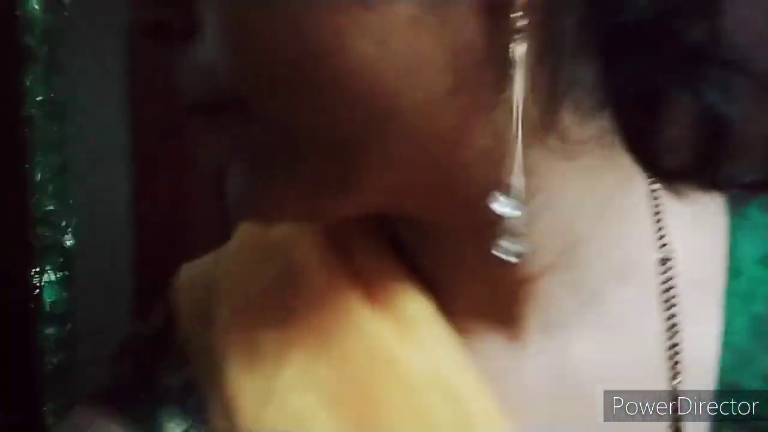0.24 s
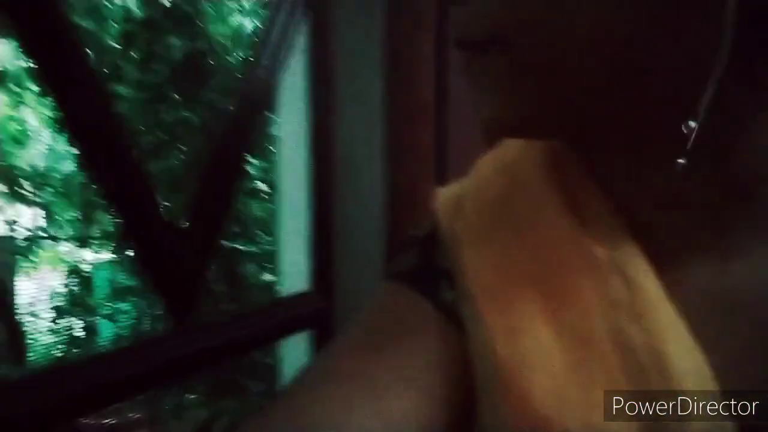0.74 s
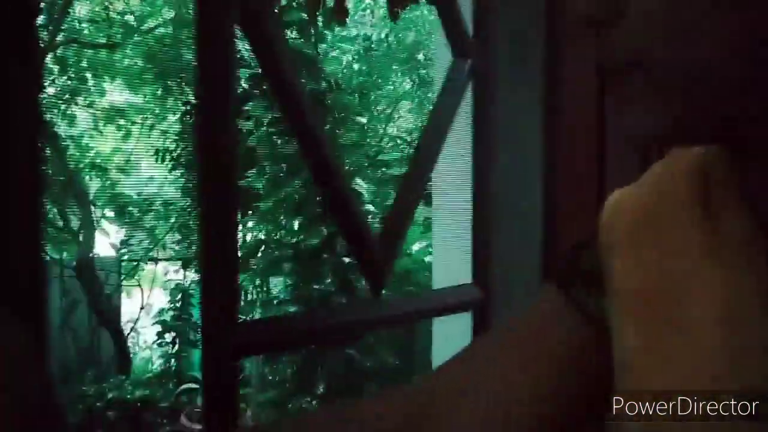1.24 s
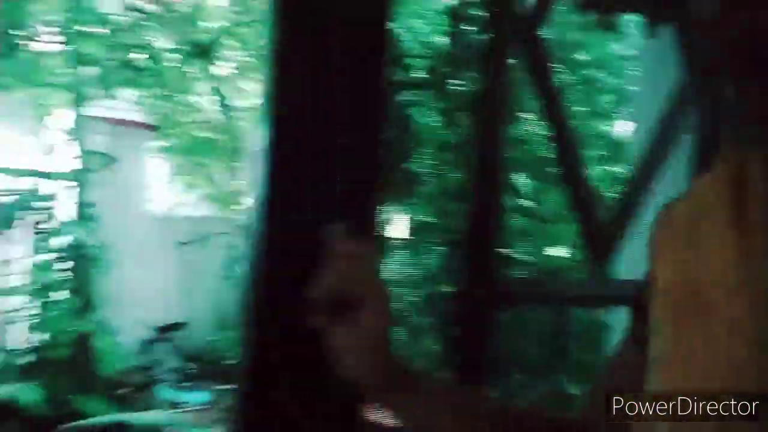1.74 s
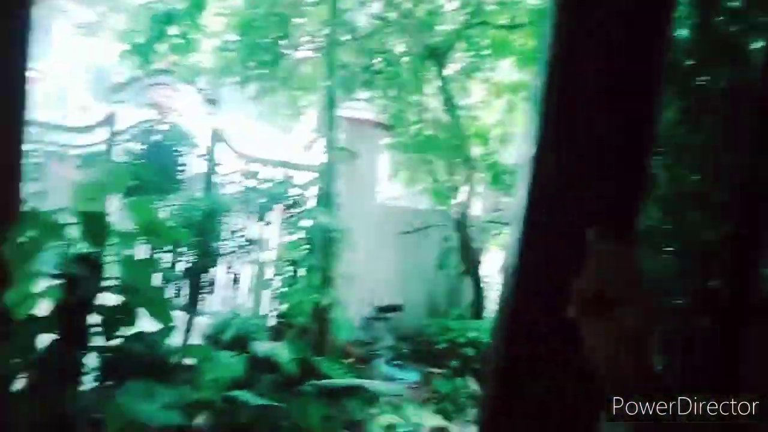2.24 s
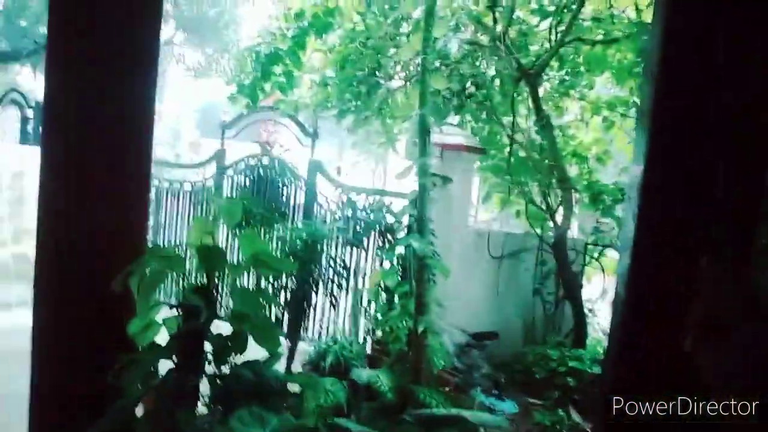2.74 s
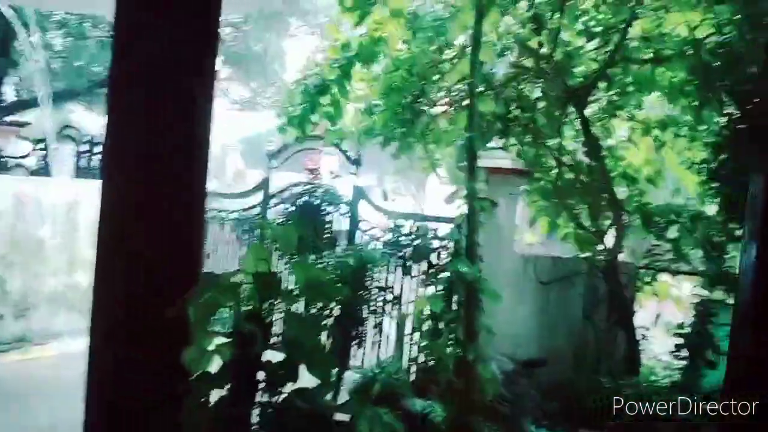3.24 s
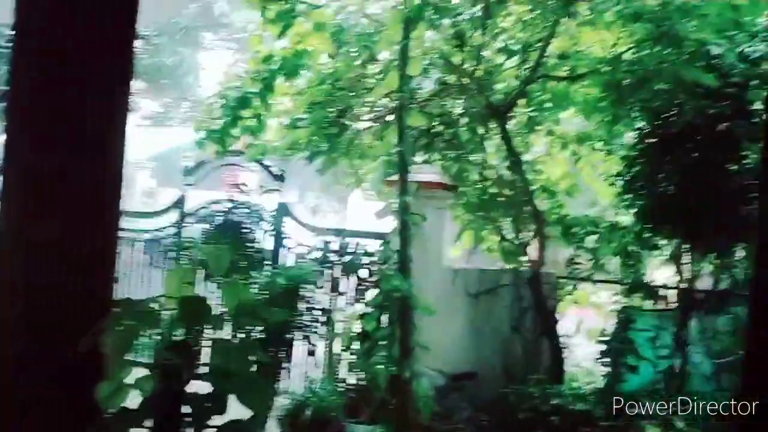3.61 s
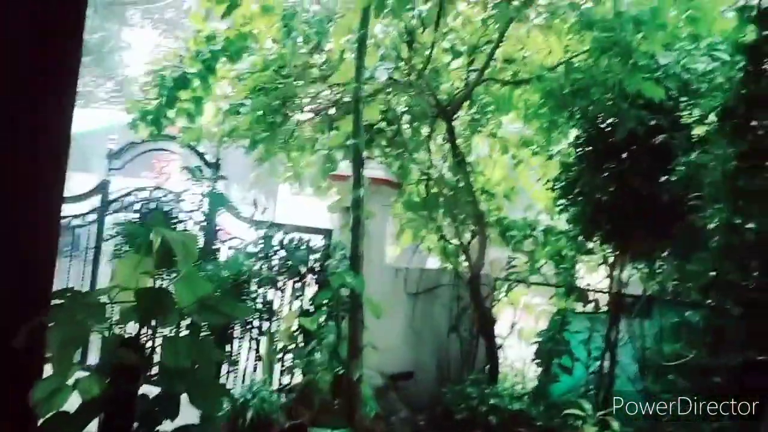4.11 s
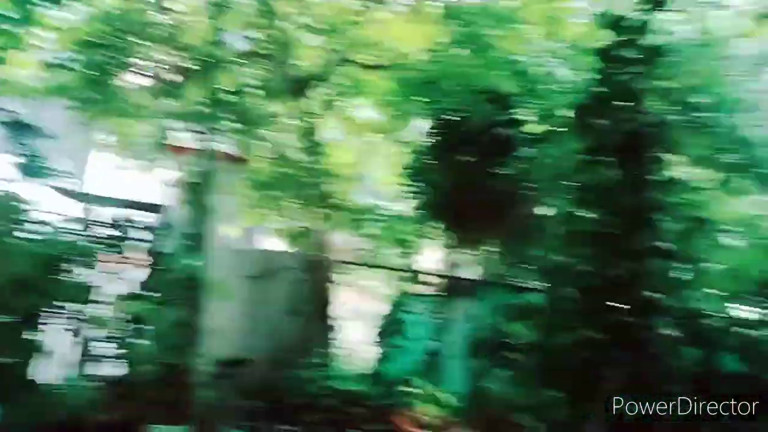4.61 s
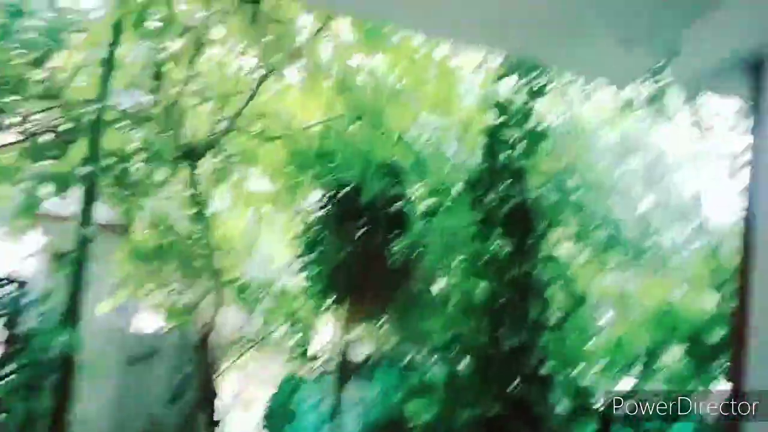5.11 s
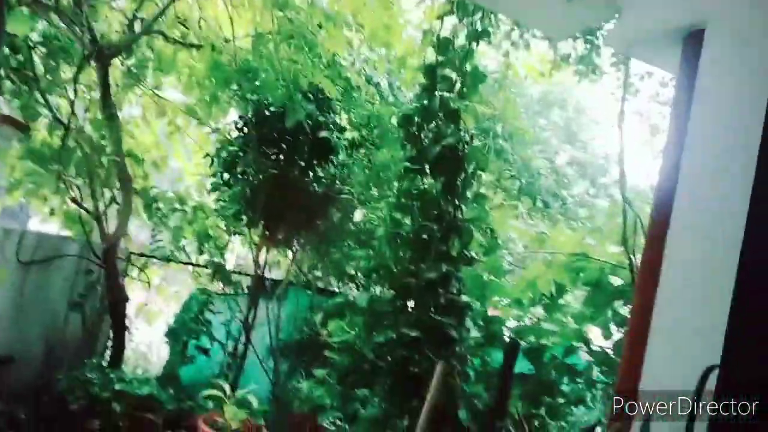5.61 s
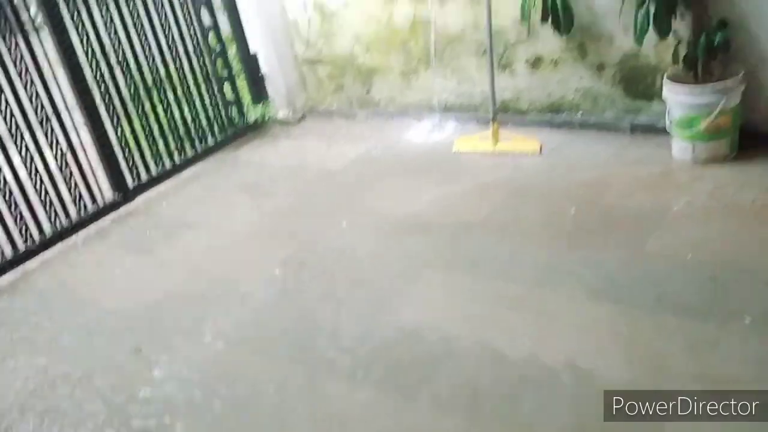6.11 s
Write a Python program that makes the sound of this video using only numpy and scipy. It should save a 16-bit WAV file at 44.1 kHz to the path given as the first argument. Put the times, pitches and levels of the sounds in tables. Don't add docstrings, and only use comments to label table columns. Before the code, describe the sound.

A dense downpour fills a garden beside a house, constantly flickering in strength. Close drops tick brightly, run-off slaps concrete in small clusters and bubbles plip underneath. The tone shifts slightly as the phone turns, with low handling bumps. After an abrupt silent gap, duller rain in a concrete yard resumes for a quarter second with a few splats. Essentially mono, close and dry.

```python
import sys
import numpy as np
from scipy import signal
from scipy.fft import rfft, irfft, next_fast_len
from scipy.io import wavfile
from scipy.ndimage import uniform_filter1d

SR = 44100
rng = np.random.default_rng(int(sys.argv[2]) if len(sys.argv) > 2 else 0)


def master(y):
    cut = np.clip(np.atleast_2d(y).T, -1, 1)
    pcm = np.round(cut * 32767)
    wavfile.write(sys.argv[1], SR, pcm.astype(np.int16))


def natural_amplitude(level_db):
    exponent = np.asarray(level_db, float) / 20
    return 10 ** exponent


N = 280299
T = np.arange(N) / SR

SPLITS_HZ = (300, 1800, 4200, 9500)
ZONE_HZ = (80, 900, 2700, 7500, 13000)
GARDEN_DB, YARD_DB = (-48, -33.5, -27.5, -31, -26.5), (-51.5, -37, -30.5, -48, -51.5)
EXPOSURE_SHARE, LULL_SHARE = (-.3, 0.19, 1.01, 0.54, .91), (.2, 1.2, 1.1, .99, 1.01)
# (flicker [dB], small drops [dB], big drops [dB], spikes [dB])
ZONE_WATER = [(0.71, -28.5, -29, -32.5), (0.41, -8, -12.5, -14.0), (0.47, -5.5, -9.5, -17.5),
              (0.46, -9.5, -7, -13.5), (1.1, -0.5, -7, -11.5)]
# (frequency [Hz], density [dB/Hz])
GARDEN_BODY = [(15, -42), (25, -14.5), (44, -14.5), (86, -12), (115, -22), (140, -17.5), (212, -13),
               (431, -11), (912, -5.5), (1820, -4.5), (2200, -0.5), (2860, -24), (4840, -120)]
# (frequency [Hz], density [dB/Hz])
GARDEN_PORT = [
    [(820, -35), (1400, -1.5), (1660, -6), (2650, 1), (3020, -3), (3250, -5.5), (4700, -14), (6110, -42.5),
     (10300, -120)],
    [(820, -38), (1400, -1.5), (1830, -6.5), (2800, -1.5), (3200, -4), (4290, -19.5), (4700, -18),
     (6110, -48), (10300, -120)],
    [(820, -39), (1400, -3), (1800, -8.5), (2410, 0), (2920, 1.5), (4700, -20.5), (6110, -49),
     (10300, -120)],
    [(820, -37), (1400, -1.5), (1620, -7), (2120, -4.5), (2310, -1), (3010, -2.5), (4700, -14.5),
     (6110, -44), (10300, -120)],
]
# (frequency [Hz], density [dB/Hz])
GARDEN_TREBLE = [
    [(2350, -35), (4000, -5), (4820, -7.5), (6390, -6.5), (8190, -0.5), (9810, -6), (11700, -4), (15300, 1)],
    [(2350, -38), (4000, -1.5), (4790, -9), (7740, 3), (9220, -7), (13200, -2), (15300, -3)],
    [(2350, -36), (4000, -2), (4480, -13), (4900, -11), (6210, -5.5), (7650, 0.5), (9060, -10.5),
     (10700, -4.5), (12900, -6), (15300, -6)],
    [(2350, -36), (4000, -6), (4400, -11.5), (4870, -10.5), (6500, -9), (8190, -1), (9750, -6.5),
     (11600, -4), (15300, 1.5)],
]
# (frequency [Hz], density [dB/Hz])
YARD_BODY = [(24, -47), (40, -20), (309, -20), (348, -13), (1430, -2), (1960, -7.5), (2540, -2),
             (4400, -17), (5720, -46), (9680, -120)]
# (frequency [Hz], density [dB/Hz])
YARD_TREBLE = [(2350, -32), (4000, -11), (4300, -3), (4980, -10), (6800, -25), (8610, -29), (9640, -19.5),
               (10900, -19), (12400, -27), (13200, -36), (15400, -41.5)]
# (time [s], aim [index])
AIM = [(2.7, 0), (3.2, 1), (3.9, 1), (4.2, 2), (4.55, 2), (4.8, 3)]
# (time [s], level [dB])
EXPOSURE = [(0, -2), (.9, -1.5), (2.1, -1), (2.7, .5), (3.2, 1.6), (4.4, 0.5), (4.6, 1), (5.0, -0.3),
            (5.5, 0.5), (6.1, -5.5), (6.15, -2.5), (6.27, -0.5), (6.36, 1)]
# (deepest time [s], depth [dB], sinking time [s])
LULLS = [(0.991, 2, 0.051), (1.065, 1.8, 0.01), (1.273, 3.1, 0.027), (1.337, 4.3, 0.019), (2.041, 2, 0.076),
         (2.96, 2, 0.01), (3.029, 2.5, 0.045), (3.515, 1.3, 0.01), (4.117, 2, 0.042), (4.63, 0, 0.018),
         (4.755, 4, 0.081), (5.099, 3, 0.046), (5.447, 5, 0.026)]
# (peak time [s], rise [dB], centre [Hz], decay [s])
SURGES = [(0.322, 2.2, 4700.0, 0.037), (0.568, 2.5, 3400.0, 0.013), (0.719, 4.5, 1300.0, 0.01),
          (1.045, 4.5, 4400.0, 0.01), (1.123, 5, 1300.0, 0.016), (1.243, 3.5, 16400.0, 0.018),
          (1.53, 2.5, 6000.0, 0.055), (1.713, 2, 2200.0, 0.01), (1.945, 3, 8100.0, 0.011),
          (2.091, 4, 4700.0, 0.01), (2.294, 3.5, 2100.0, 0.024), (2.33, 6, 11900.0, 0.027),
          (2.873, 0, 700.0, 0.025), (2.969, 5.0, 16400.0, 0.027), (3.188, 2.5, 1500.0, 0.01),
          (3.21, 2.5, 16400.0, 0.12), (3.456, 1.5, 6200.0, 0.012), (3.567, 1.5, 3900.0, 0.01),
          (3.773, 2.9, 6200.0, 0.019), (3.921, 3, 16400.0, 0.03), (4.053, 4.5, 3900.0, 0.12),
          (4.255, 3, 7400.0, 0.071), (4.388, 6.5, 5300.0, 0.013), (4.584, 2.4, 16400.0, 0.014),
          (4.846, 4, 14200.0, 0.013), (4.95, 3.5, 8800.0, 0.096), (5.183, 3.4, 10000.0, 0.024),
          (5.27, 2.2, 15600.0, 0.12), (5.41, 0.5, 16400.0, 0.12)]
# (peak time [s], rise [dB], centre [Hz], decay [s])
YARD_SURGES = [
    (6.125, 5, 14000, .015),
    (6.185, 2.5, 5000, .01),
    (6.3, 3, 13000, .02),
    (6.34, 3, 12000, .02),
]
# (peak time [s], rise [dB], centre [Hz], decay [s])
GRIPS = [(.5, 2, 70, 0.43), (1.55, 2.5, 70, .1), (2.12, 4, 70, 0.056), (2.55, 4, 70, 0.19),
         (3.95, 0, 69.9, 1.4)]
# (time [s], peak [dB], pitch [Hz])
TICKS = [(0.1201, -21, 14700), (0.3047, -10.5, 8170), (1.1024, -6, 8450), (1.2271, -4, 13500),
         (1.3643, -17, 8490), (1.4995, -16, 8300), (1.7908, -17, 14900), (1.932, -12, 14900),
         (2.0792, -24.5, 7800), (2.1824, -16, 7850), (2.2957, -17, 8350), (2.4189, -9.5, 14200),
         (2.9387, -16.5, 8490), (3.5473, -7, 13400), (3.6641, -11, 7660), (3.7404, -17, 7780),
         (3.8955, -10, 13300), (3.9429, -18, 7320), (4.145, -11, 7520), (4.57, -11.5, 13100),
         (4.7795, -17, 8270), (4.9147, -10, 8500), (5.2664, -13, 8700), (5.3303, -15, 8380),
         (5.3867, -8, 8450)]
# (time [s], peak [dB], pitch [Hz])
SPLATS = [(0.533, -14, 2550), (0.564, -15.5, 2650), (0.606, -13.5, 2510), (0.714, -12, 2730),
          (0.859, -15, 2400), (0.875, -19, 2430), (0.886, -13, 2550), (1.9315, -15, 2320),
          (2.234, -10, 2600), (2.2862, -13.5, 2920), (2.3094, -13, 2850), (2.3252, -17, 2335),
          (3.1694, -13, 2130), (3.5438, -10.5, 2050), (3.7649, -11, 2420), (4.336, -20, 2410),
          (4.3424, -17, 2880), (4.3695, -12, 2780), (4.3734, -15.5, 2644), (4.3785, -19, 3070),
          (4.3904, -20, 2880), (4.3974, -19, 2860), (4.4034, -23, 2725), (4.672, -14, 2600),
          (4.69, -14, 2510), (5.1572, -12.5, 2260), (5.4144, -27, 2460), (6.2886, -15, 2630),
          (6.299, -17.5, 2440), (6.3073, -12.5, 2570)]
# (time [s], peak [dB], pitch [Hz])
SPRAY = [(2.2838, -25, 3550), (2.2968, -19, 3600), (2.3028, -20, 3850), (2.3143, -15.5, 3740),
         (2.3427, -24, 3520), (2.3706, -21, 3810)]
# (time [s], peak [dB], start pitch [Hz])
BUBBLES = [(0.708, -23.5, 1060), (0.744, -34, 1510), (0.769, -24, 1010), (0.785, -26, 1090),
           (1.119, -25, 1560), (1.149, -25.5, 1700), (1.93, -17, 1410), (2.84, -20, 1160),
           (2.857, -18, 1440), (2.869, -20.5, 1300), (2.884, -22.5, 1268), (3.07, -22, 1430),
           (4.278, -16.5, 1730), (4.379, -23.5, 966), (4.575, -23, 1390), (4.556, -29, 1240),
           (4.685, -23, 1150), (4.853, -34, 1320), (5.1535, -19, 964), (5.165, -16, 1180),
           (5.175, -24, 1110), (5.189, -23, 1090)]
# (time [s], peak [dB], pitch [Hz])
THUDS = [(2.559, -48, 178), (2.699, -33, 167), (3.608, -32, 165), (3.654, -35.5, 169.6), (3.780, -33, 330),
         (3.7885, -27.5, 216), (3.833, -28, 380), (3.847, -32, 190)]
# (start [s], end [s])
SHOTS = [
    (0, 5.4888),
    (6.1022, 6.3567),
]
# (time [s], low edge [Hz], high edge [Hz], level [dB])
SIDE_BLIPS = [(.449, 5700, 7000, -47), (.449, 12400, 14700, -42), (.89, 5160, 7800, -40),
              (.89, 11600, 13400, -45), (1.913, 11700, 14700, -39), (4.003, 6200, 8600, -37)]


def unit(x):
    return x / np.sqrt(np.mean(x ** 2))


def shaped(x, gain_at):
    size = next_fast_len(len(x))
    hz = np.arange(1, size // 2 + 2) * SR / size
    return irfft(rfft(x, size) * gain_at(hz), size)[:len(x)]


def walk(rate_hz):
    hold = int(SR / rate_hz)
    steps = np.repeat(rng.standard_normal(N // hold + 1), hold)
    level = uniform_filter1d(uniform_filter1d(steps, hold), hold)[:N]
    return unit(level - uniform_filter1d(level, size=4 * hold))


def hump(x, rise, fall):
    return np.exp(-.5 * (x / np.where(x < 0, rise, fall)) ** 2)


def impacts(rate_hz, spread_db, limit):
    size = np.minimum(rng.exponential(size=N), limit)
    return (rng.random(N) < rate_hz / SR) * natural_amplitude(spread_db * size)


def drops(rate_hz, spread_db, tail_s):
    hit_power = impacts(rate_hz, 2 * spread_db, 3.5)
    power = signal.lfilter([1], [1, -np.exp(-1 / (tail_s * SR))], hit_power)
    return unit(np.sqrt(power) * rng.standard_normal(N))


def clicks(rate_hz, spread_db):
    hit = impacts(rate_hz, spread_db, 3)
    return unit(uniform_filter1d(hit * rng.choice([-1., 1.], N), size=2))


def downpour():
    big = drops(260, spread_db=2.0, tail_s=0.0017)
    spikes = clicks(500, spread_db=1.5)
    gouts = walk(25)
    water = []
    for flicker_db, small_db, big_db, spike_db in ZONE_WATER:
        hiss = rng.standard_normal(N)
        hiss += natural_amplitude(small_db) * drops(1500, spread_db=3.0, tail_s=.0004)
        hiss += natural_amplitude(big_db) * big + natural_amplitude(spike_db) * spikes
        water.append(hiss * natural_amplitude(flicker_db * walk(30) + 0.31 * gouts))
    return np.array(water)


def flow(t, mean_db):
    recover_s, build_s, width_octaves = 0.023, .03, 0.76
    facing = np.interp(t, *np.transpose(EXPOSURE))
    lull = sum(db * hump(t - s, sink_s, recover_s) for s, db, sink_s in LULLS)
    level = np.array(mean_db)[:, None] + np.outer(EXPOSURE_SHARE, facing) - np.outer(LULL_SHARE, lull)
    for s, db, hz, die_s in [*SURGES, *YARD_SURGES, *GRIPS]:
        octaves = np.log2(np.array(ZONE_HZ) / hz)
        reach = hump(octaves, width_octaves, width_octaves)
        level = level + np.outer(reach, db * hump(t - s, build_s, die_s))
    return natural_amplitude(level)


def below(hz, edge_hz):
    return 1 / (1 + (hz / edge_hz) ** 12)


def zone(source, colour, k):
    colour_hz, colour_db = np.transpose(colour[1:])
    edges_hz = (1e-3, *SPLITS_HZ, 1e6)

    def gain_at(hz):
        share = np.sqrt(np.abs(below(hz, edges_hz[k + 1]) - below(hz, edges_hz[k])))
        return natural_amplitude(np.interp(np.log(hz), np.log(colour_hz), colour_db)) * share

    return unit(shaped(source, gain_at))


def rain(t, mean_db, body, ports, trebles, water):
    gain = flow(t, mean_db)
    aim = np.minimum(np.interp(t, *np.transpose(AIM)), len(ports) - 1)
    facing = [np.clip(1 - abs(aim - j), 0, 1) for j in range(len(ports))]
    out = zone(water[0], body, 0) * gain[0] + zone(water[1], body, 1) * gain[1]
    for k, colours in ((2, ports), (3, trebles), (4, trebles)):
        out += sum(w * zone(water[k], c, k) for w, c in zip(facing, colours)) * gain[k]
    return out


def garden_then_yard():
    water, cut = downpour(), int(5.7 * SR)
    garden = rain(T[:cut], GARDEN_DB, GARDEN_BODY, GARDEN_PORT, GARDEN_TREBLE, water[:, :cut])
    yard = rain(T[cut:], YARD_DB, YARD_BODY, [YARD_BODY], [YARD_TREBLE], water[:, cut:])
    return np.concatenate([garden, yard])


def grains(table, cycles, glide, rough, trim_db):
    out = np.zeros(N + SR)
    for s, db, hz in table:
        turn = np.arange(int(6 * cycles * SR / hz)) * hz / SR
        shape = (1 - np.exp(-turn / 0.31)) * np.exp(-turn / cycles)
        period = int(SR / hz)
        steps = np.repeat(rng.standard_normal(99), period)
        waver = unit(uniform_filter1d(steps, size=period))[:len(turn)]
        ring = np.sin(2 * np.pi * (turn + glide * turn ** 2 / (2 * cycles)) + rough * waver)
        i = int(s * SR)
        out[i:i + len(turn)] += natural_amplitude(db + trim_db) * shape * ring
    return out[:N]


def near_ticks():
    return grains(TICKS, cycles=4.0, glide=-.02, rough=0.62, trim_db=-0.5)


def runoff_splats():
    splats = grains(SPLATS, cycles=3.0, glide=.03, rough=.4, trim_db=1.5)
    return splats + grains(SPRAY, cycles=5.0, glide=.03, rough=0.64, trim_db=3.0)


def plips(count, lo_hz, hi_hz, db, spread_db):
    when, pitch, size = rng.random((count, 3)).T
    peak_db = db - spread_db * np.log(.1 + size)
    return np.transpose([when * N / SR, peak_db, lo_hz * (hi_hz / lo_hz) ** pitch])


def puddle_bubbles():
    faint = plips(count=700, lo_hz=772, hi_hz=3420, db=-34.5, spread_db=5.0)
    bubbles = grains(BUBBLES, cycles=5.0, glide=0.02, rough=.5, trim_db=1.5)
    return bubbles + grains(faint, cycles=3.2, glide=0.039, rough=0.23, trim_db=-4.0)


def finger_thuds():
    return grains(THUDS, cycles=0.77, glide=-0.026, rough=.2, trim_db=10)


def scene():
    mono = garden_then_yard() + near_ticks() + runoff_splats() + puddle_bubbles() + finger_thuds()
    return np.array([mono, mono])


def bias_settling():
    start, end, settle_s = 0.03, -0.032, 0.056
    since_s = np.maximum(T - SHOTS[1][0], 0)
    return (since_s > 0) * (end + (start - end) * np.exp(-since_s / settle_s))


def side_hiss():
    side = np.zeros(N)
    for s, lo_hz, hi_hz, db in SIDE_BLIPS:
        hiss = unit(shaped(rng.standard_normal(2048), lambda hz: (hz > lo_hz) & (hz < hi_hz)))
        i = int(s * SR) - 1024
        side[i:i + 2048] += natural_amplitude(db) * hiss * np.sqrt(np.hanning(2048))
    return np.array([side, -side])


def top_cut(x):
    return shaped(x, lambda hz: natural_amplitude(-.45 * np.maximum(hz - 15480, 0)))


def band_limit(x):
    return signal.sosfilt(signal.butter(12, 16830, fs=SR, output="sos"), x)


def record(dry):
    on = sum(np.clip((T - start) / .0002, 0, 1) * (T < end) for start, end in SHOTS)
    dull = np.array([top_cut(x) for x in dry])
    mix = (dull + bias_settling()) * on + side_hiss()
    return band_limit(mix)


dry = scene()
out = record(dry)
master(out)
```